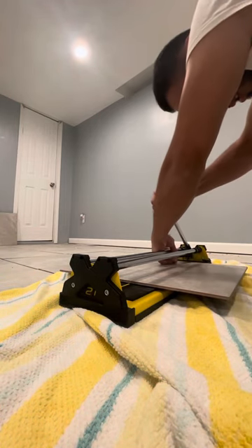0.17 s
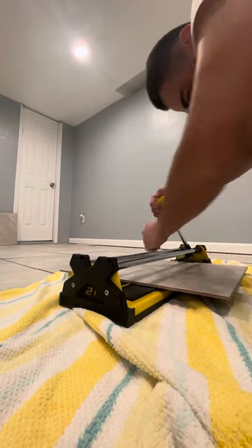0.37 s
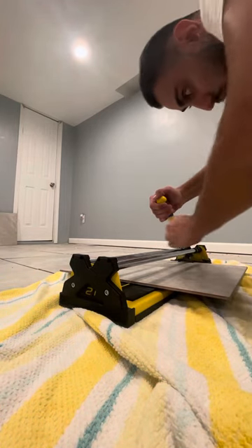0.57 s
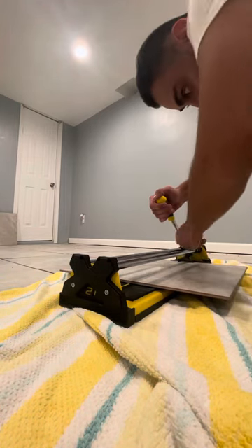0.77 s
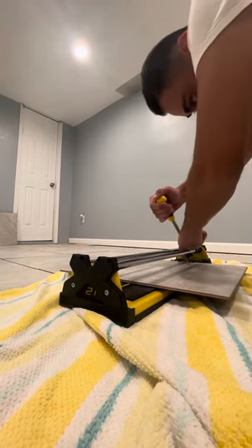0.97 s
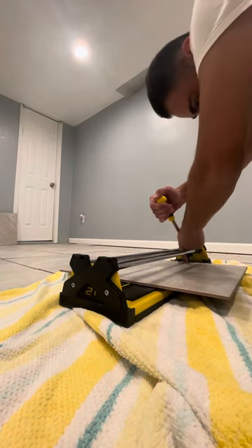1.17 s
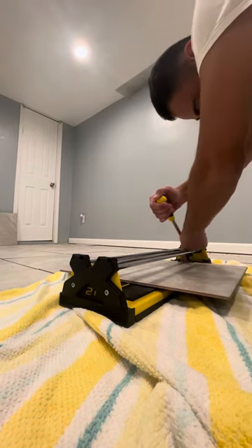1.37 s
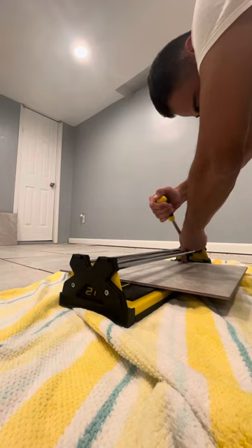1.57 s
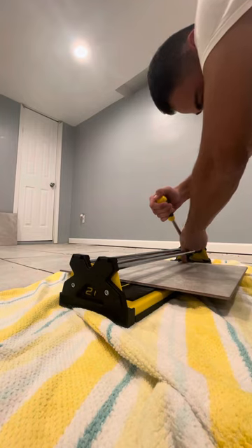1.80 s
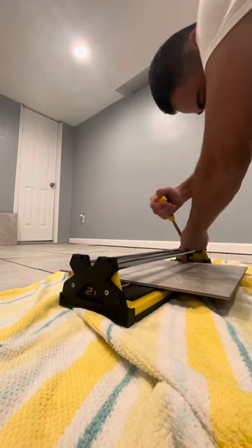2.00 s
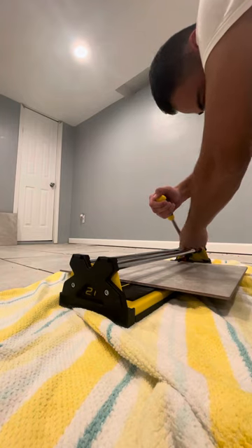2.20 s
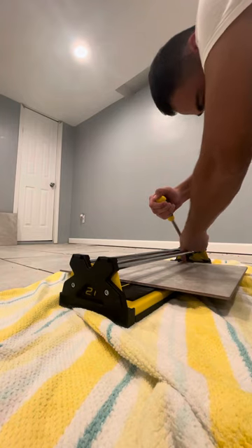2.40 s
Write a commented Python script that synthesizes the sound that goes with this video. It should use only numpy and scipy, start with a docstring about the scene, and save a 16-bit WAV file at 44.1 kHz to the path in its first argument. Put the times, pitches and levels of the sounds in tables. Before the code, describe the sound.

A manual tile cutter works close to the microphone in a bare, echoing room with a faint hum. At about 0.2 seconds a tile lands on the steel bed with a ringing clank. From 0.4 to 1.6 the carriage rolls quietly, with dull knocks, a click and faint scrapes. At 2 seconds the tile snaps loudly with a shrill ping, and the halves clatter down until about 2.4.

```python
"""A faint hum in a bare tiled room, then a clank close to a phone on the floor: a tile is set down
on the steel bed of a manual cutter, and the frame rings. The carriage slides and knocks along its rails,
then the breaker snaps the tile: cracks, and a shrill ping that rings on in the phone's microphone ports.
The halves clatter down while the phone's limiter recovers."""
import sys
import numpy as np
from scipy import signal
from scipy.fft import rfft, irfft
from scipy.io import wavfile
from scipy.ndimage import uniform_filter1d, minimum_filter1d

SR = 44100
rng = np.random.default_rng(int(sys.argv[2]) if len(sys.argv) > 2 else 0)


def generate_wav(signal):
    """Clip the signal to [-1, 1] and save it as 16-bit WAV at the path in sys.argv[1]."""
    frames = np.transpose(np.atleast_2d(signal))
    scaled = np.clip(frames, -1, 1) * 32767
    pcm = np.round(scaled).astype(np.int16)
    wavfile.write(sys.argv[1], SR, pcm)


N = 108045
T = np.arange(N) / SR
BIN_HZ = np.arange(N // 2 + 1) * SR / N


def undb(db):
    """Decibels to gain."""
    return 10 ** (np.asarray(db) / 20)


def unit(x):
    """Scale to rms 1."""
    return x / np.sqrt(np.mean(x ** 2))


def blow(x):
    """Scale to the energy of 10 ms at rms 1."""
    return x * np.sqrt(SR / 100 / np.mean(np.sum(x ** 2, axis=-1)))


def at(points, hz):
    """Read (Hz, value) points on a log-frequency axis."""
    p = np.array(points)
    return np.interp(np.log(hz + 1), np.log(p[:, 0]), p[:, 1])


def colour(x, points, tilt=0):
    """Causal filter through (Hz, dB) points, tilted in dB per octave about 2 kHz."""
    hz = np.arange(1025) * SR / 2048
    gain = undb(at(points, hz) + tilt * np.log2(np.maximum(hz, 300) / 2000))
    cepstrum = irfft(np.log(gain))
    cepstrum[1:1024] *= 2  # fold to minimum phase
    cepstrum[1025:] = 0
    impulse = irfft(np.exp(rfft(cepstrum)))
    return signal.fftconvolve(x, impulse[None], axes=1)[:, :x.shape[1]]


def noise(width):
    """Noise at the phone's two microphones; width is (Hz, side minus mid dB) points."""
    mid, side = rfft(rng.standard_normal((2, N)))
    share = undb(at(width, BIN_HZ))
    return irfft(np.array([mid + share * side, mid - share * side]) / np.sqrt(1 + share ** 2), N)


def fade(t60, t=T):
    """Exponential decay by 60 dB in t60 seconds."""
    return np.exp(-np.log(1000) * t / max(t60, 1e-4))


def add(out, start, x):
    """Mix x in from start, in seconds."""
    i = int(start * SR)
    n = min(x.shape[1], N - i)
    out[:, i:i + n] += x[:, :n]


def narrow(hz, width_hz):
    """A wavering tone: noise in one narrow resonance."""
    resonance = 1 / (1 + (2 * (BIN_HZ - hz) / width_hz) ** 2)
    return unit(irfft(rfft(rng.standard_normal(N)) * resonance, N))


# Stereo width close to the phone. Each row: frequency in Hz, side minus mid in dB.
NEAR_WIDTH = [(60, -17), (110, -21.5), (200, -17), (370, -10.5), (690, -4), (1270, -9), (2340, -11.5),
              (4310, -2.5), (7930, 0.5), (14600, -1)]
def burst(points, t60, tilt=0):
    """A short, close crack of dense, quickly damped modes."""
    decaying = noise(NEAR_WIDTH) * fade(t60)
    return blow(colour(decaying[:, :SR // 4], points, tilt))


# The room's hum, heard from the floor. Each row: frequency in Hz, relative level in dB.
HUM_TONES = [(75.4, -65), (156.1, -66), (193.8, -58.5), (242.2, -65)]
# The air around the phone. Each row: frequency in Hz, relative density in dB.
AIR_SPECTRUM = [(20, -40), (35, -6), (70, -10), (110, -5), (190, -6), (280, -4.5), (400, -12.5), (570, -9),
                (750, -19), (1200, -23.5), (1800, -38), (3000, -39.5), (6500, -46.5), (8500, -53),
                (11000, -50.5), (13000, -68)]
# Its stereo width. Each row: frequency in Hz, side minus mid in dB.
AIR_WIDTH = [(60, -11), (110, -9.5), (200, -16), (370, -3), (690, 2.5), (1270, 4), (2340, -1), (4310, -1),
             (7930, 1), (14600, 3)]
def room_tone(waver=.36, hum_trim_db=-.5, air_db=-56.5):
    """A low, wavering hum over the air of the room."""
    hum = sum(undb(db) * (np.sqrt(2) * np.sin(2 * np.pi * hz * T) + waver * narrow(hz, width_hz=14))
              for hz, db in HUM_TONES)
    air = unit(colour(noise(AIR_WIDTH), AIR_SPECTRUM))
    return undb(hum_trim_db) * hum + undb(air_db) * air


# Slides on the cutter, close by. Each row: peak time in seconds, level in dB,
# rise and fall in seconds, treble tilt in dB per octave.
SLIDE_STROKES = [(.215, -59, 0.052, 0.06, 2), (1.256, -58.5, 0.012, .02, -9),
                 (1.446, -61, 0.034, 0.025, -5), (1.547, -58.5, 0.018, 0.025, -0.5)]
# Their scrape at the phone. Each row: frequency in Hz, gain in dB.
SLIDE_SPECTRUM = [(300, -7), (1000, 6.5), (2800, -1.5), (4000, -13.5), (6500, -6), (8500, -9.5),
                  (11000, -11.5), (13500, -31.5)]
def slides(grain=.4):
    """Tile and carriage slide with a gritty friction that swells and dies away."""
    out = np.zeros((2, N))
    for peak, db, rise, fall, tilt in SLIDE_STROKES:
        hiss = noise(NEAR_WIDTH)
        roughness = np.repeat(rng.standard_normal(N // 64 + 1), 64)[:N]
        grit = unit(colour(hiss * np.exp(grain * roughness), SLIDE_SPECTRUM, tilt))
        swell = np.exp(-np.maximum((peak - T) / rise, (T - peak) / fall))
        out += undb(db) * grit * swell
    return out


# Knocks on the base, near the phone. Each row: start in seconds, level in dB, t60 in seconds.
BASE_KNOCKS = [(.165, -55, 0.12), (.258, -36, 0.19), (0.8001, -36.5, 0.042), (.811, -40, 0.046),
               (.84, -69, 0.075), (0.889, -62, .08), (0.995, -43.5, 0.15), (2.045, -31, 0.11),
               (2.119, -32, 0.062), (2.25, -45.5, 0.21)]
# Their dull tone. Each row: frequency in Hz, gain in dB.
KNOCK_SPECTRUM = [(60, -31.5), (180, -6), (290, -1), (430, 3), (560, -14.5), (720, -8.5), (950, -24.5),
                  (1200, -32), (2000, -46), (8000, -66.5)]
def knocks():
    """Hand, carriage and tile thud on the padded base."""
    out = np.zeros((2, N))
    for start, db, t60 in BASE_KNOCKS:
        add(out, start, undb(db) * burst(KNOCK_SPECTRUM, t60))
    return out


def judder(hz=850, db=-39, centre_s=.228, half_length_s=.016):
    """The tile's edge judders just before it drops."""
    return undb(db) * narrow(hz, width_hz=160) * np.exp(-((T - centre_s) / half_length_s) ** 4)


# The tile lands beside the phone, and later its halves. Each row: start in seconds, level in dB,
# treble tilt in dB per octave, chatter in seconds, lasting ring and dry clack in relative dB.
FRAME_BLOWS = [(.2132, -52.5, -3, .002, -26.5, 1), (0.224, -51, -2, .002, -31.5, -11.5),
               (0.245, -22, -1, 0.0031, -29, -5), (0.2487, -20, 1.5, 0.00072, -24.5, -9),
               (0.2532, -15.5, 0, 0.0029, -23.5, -10), (0.271, -26, 5, 0.011, -15, -5.5),
               (2.036, -27, -0.5, .003, -37, -6), (2.103, -28, 0, 0.0028, -43, -7),
               (2.1151, -16, 2.2, 0.00076, -32, -11), (2.123, -23.5, 1, 0.0022, -13.5, -9.5),
               (2.141, -33, 5.5, 0.0048, -25, -1), (2.243, -38.5, 1, 0.0091, -25, -5),
               (2.266, -39.5, 2, 0.015, -13, 1.5), (2.341, -44, -4, 0.003, -26, 10)]
# The steel frame with the tile on it. Each row: frequency in Hz, relative level in dB, t60 in seconds.
FRAME_MODES = [(441, -8, 0.5), (554, -5, 0.35), (783, -1, 0.48), (875, -9, .3), (953, -5, 0.42),
               (1028, -12, 0.45), (1143, 0, 0.32), (1500, 1, 0.25), (1539, -3, 0.41), (1578, -7, 0.4),
               (1746, -3, 0.31), (2126, 1, 0.3), (2187, -6, 0.36), (2334, -11, 0.37), (2491, -8, 0.4),
               (2657, -4, 0.41), (2939, -12, 0.49), (3035, -7, 0.5), (3275, -5, 0.43), (3365, -13, 0.6),
               (3948, -6, 0.38), (4016, -4, 0.48), (4224, -9, 0.56), (4611, -17, 0.5), (4805, -14, 0.5),
               (5095, -9, 0.4), (5737, -16, 0.57), (6205, -11, 0.31), (6325, -7, 0.29), (6514, -9, 0.36),
               (6553, -11, 0.53), (6891, -18, 0.5), (7419, -14, 0.26), (8230, -26, 0.3), (8754, -17, 0.38),
               (9300, -25, 0.3), (9850, -17, 0.25), (10100, -20, 0.2), (10450, -21, 0.2)]
# The dry clack of contact. Each row: frequency in Hz, gain in dB.
CLACK_SPECTRUM = [(60, -17.5), (200, -10.5), (500, -9.5), (1500, -3), (2600, -0.5), (3600, -12.5),
                  (6400, -12), (8000, -23), (10300, -15), (12000, -51.5)]
# The whole clank as heard from the floor. Each row: frequency in Hz, gain in dB.
CLANK_SPECTRUM = [(200, 0), (450, -0.5), (800, -0.5), (1300, 0), (2100, 3), (3100, 0.5), (4100, -5),
                  (5300, 2), (6500, 4), (9000, 0.5), (11000, 2.5), (12500, -21)]
def clanks(detune=.002, quick_t60=.061, clack_t60=.02):
    """Each blow chatters on the frame, whose modes lose most energy at once and then ring on."""
    out, t = np.zeros((2, N)), T[:SR * 3 // 4]
    for start, db, tilt, chatter, ring_db, clack_db in FRAME_BLOWS:
        ring = 0
        for hz, mode_db, t60 in FRAME_MODES:
            turns, side, drift = rng.standard_normal(3)
            spread = np.sign(side) * np.arctan(undb(at(NEAR_WIDTH, hz)))
            phase = 2 * np.pi * turns + np.array([[spread], [-spread]])  # one per microphone
            decay = fade(quick_t60, t) + undb(ring_db) * fade(t60, t)
            ring += undb(mode_db) * decay * np.sin(2 * np.pi * hz * (1 + detune * drift) * t + phase)
        clank = blow(ring * (1 - np.exp(-2 * t / chatter)))
        clack = burst(CLACK_SPECTRUM, clack_t60 + 2 * chatter)
        clank[:, :clack.shape[1]] += undb(clack_db) * clack
        add(out, start, undb(db) * blow(colour(clank, CLANK_SPECTRUM, tilt)))
    return out


# The rolling drone, alike at both microphones. Each row: time in seconds, relative level in dB.
ROLL_LEVELS = [(0.4, -70), (0.45, -51), (0.566, -48), (0.782, -51.5), (0.806, -45), (0.946, -61),
               (1.38, -62), (1.5, -76.5)]
# A close click on the rails. Each row: start in seconds, level in dB, t60 in seconds.
RAIL_CLICKS = [(0.987, -47.5, 0.08)]
# Its tone at the phone. Each row: frequency in Hz, gain in dB.
CLICK_SPECTRUM = [(100, -15), (450, 4), (850, 8), (1200, -2), (1650, 0), (2200, -5.5), (2900, -11.5),
                  (3600, -27), (6500, -19), (10500, -40), (12500, -48)]
# The carriage's ring. Each row: frequency in Hz, level against the click in dB, t60 in seconds.
CARRIAGE_MODES = [(467, -3, 0.68), (844, -20.5, .2), (1551, -9, 0.2), (1755, -5.5, 0.053),
                  (2990, -16.5, 0.154), (5650, -27, .2), (6800, -22, 0.22), (9340, -27, 0.26),
                  (10600, -30, 0.22)]
def carriage(drone_hz=282, drone_trim_db=-5, rattle_width_hz=45):
    """The carriage rolls with a low drone and clicks on the rails; its loose parts blur the ring."""
    times, levels = np.array(ROLL_LEVELS).T
    roll_db = np.interp(T, times, levels, left=-120, right=-120) + drone_trim_db
    drone = narrow(drone_hz, width_hz=42) * undb(roll_db)
    out = np.array([drone, drone])
    for start, db, t60 in RAIL_CLICKS:
        add(out, start, undb(db) * burst(CLICK_SPECTRUM, t60))
        for hz, mode_db, ring_t60 in CARRIAGE_MODES:
            ring = np.array([narrow(hz, rattle_width_hz) for _ in range(2)]) / np.sqrt(2)
            add(out, start, undb(db + mode_db) * fade(ring_t60) * ring)
    return out


# The tile gives way, close up. Each row: start in seconds, level in dB,
# treble tilt in dB per octave, t60 in seconds.
TILE_CRACKS = [(2.0127, -33, -5, 0.18), (2.025, -31, -3, 0.035), (2.031, -27.5, -6.5, 0.054),
               (2.0364, -12, 3, 0.025), (2.0393, -16, -1.5, 0.075)]
# One crack at the phone. Each row: frequency in Hz, gain in dB.
CRACK_SPECTRUM = [(30, -21), (60, -23), (300, -2.5), (650, 2), (1400, -3.5), (2100, -2), (3800, -18.5),
                  (6000, -2), (8000, -11.5), (11000, 1), (13500, -34)]
def cracks():
    """Cracks run through the tile under the breaker and lead to the break."""
    out = np.zeros((2, N))
    for start, db, tilt, t60 in TILE_CRACKS:
        add(out, start, undb(db) * burst(CRACK_SPECTRUM, t60, tilt))
    return out


# The break, right by the phone. Each row: start in seconds, level before the limiter in dB.
BREAK_PINGS = [(2.0365, -6), (2.03851, -7)]
# The tile's shrill modes. Each row: frequency in Hz, relative level in dB, t60 in seconds.
TILE_MODES = [(7580, -19, 0.045), (9500, 4, 0.0058), (9900, 9, 0.009), (10500, 0, 0.006),
              (11100, -6, 0.003)]
def ping(rise_s=.00057, mic_lag_s=.000045):
    """The break sets the tile ringing; the sound reaches one microphone just after the other."""
    out = np.zeros((2, N))
    t = np.maximum(T[:SR // 2] - np.array([[0], [mic_lag_s]]), 0)
    ring = sum(undb(db) * fade(t60, t) * np.sin(2 * np.pi * hz * t) for hz, db, t60 in TILE_MODES)
    ring = blow(ring * (1 - np.exp(-(t / rise_s) ** 2)))
    for start, db in BREAK_PINGS:
        add(out, start, undb(db) * ring)
    return out


# The bare tiled room around the cutter. Each row: frequency in Hz, t60 in seconds.
ROOM_DECAY = [(100, .6), (400, 0.77), (1000, .7), (3000, 0.58), (6500, 0.49), (10000, 0.21)]
# Its tail, heard from the floor. Each row: frequency in Hz, gain in dB.
TAIL_SPECTRUM = [(60, -10), (300, 0), (700, 0), (2000, -7), (4000, 6.5), (6500, -1.5), (8500, -2.5),
                 (10000, -11.5), (11200, -10.5), (12500, -31.5)]
# The tail's stereo width. Each row: frequency in Hz, side minus mid in dB.
TAIL_WIDTH = [(60, -9.5), (110, -11.5), (200, -18), (370, -7), (690, 2.5), (1270, 1.5), (2340, -6.5),
              (4310, -3.5), (7930, 1), (14600, -4.5)]
def reverberation(x, gain_db=-4.5, onset_s=.0089):
    """Hard walls and floor return a dense tail, each band with its own decay."""
    spectrum = rfft(noise(TAIL_WIDTH))
    centres_hz = [100, 200, 400, 800, 1600, 3200, 6400, 10000]
    octave = np.log2(np.clip(BIN_HZ, centres_hz[0], centres_hz[-1]))
    tail = np.zeros((2, N))
    for hz in centres_hz:
        band = np.maximum(1 - abs(octave - np.log2(hz)), 0)
        tail += irfft(spectrum * band, N) * fade(at(ROOM_DECAY, hz))
    tail *= 1 - np.exp(-(T / onset_s) ** 2)
    tail = colour(unit(tail) / np.sqrt(N), TAIL_SPECTRUM)
    return undb(gain_db) * signal.fftconvolve(x, tail, axes=1)[:, :N]


# Resonances of the phone's microphone ports. Each entry: frequency in Hz.
PORT_CENTRES = [8750, 9550, 9835]
# Their shapes, in the same order. Each row: width in Hz, gain in dB.
PORT_PEAKS = [(130, 7), (300, 6), (110, 16.5)]
def port_ring(x):
    """Excited by the reverberation, the two microphone ports ring shrilly in opposite phase."""
    lift = sum(undb(db) / (1 + 2j * (BIN_HZ - hz) / width)
               for hz, (width, db) in zip(PORT_CENTRES, PORT_PEAKS))
    side = irfft(rfft(x[0] - x[1]) / 2 * lift, N)
    return x + np.array([side, -side])


def scene():
    """The cutter stands close to the phone, a little to the right, and the room answers."""
    pan = undb([[-.7], [.7]])
    cutter = clanks() + cracks() + ping() + knocks() + slides() + judder() + carriage()
    return pan * (cutter + room_tone()) + port_ring(pan * reverberation(cutter))


def record(dry, limit=.8, hold_s=.087, recover_db_per_s=57, top_hz=14500):
    """The phone's limiter ducks at the loudest peak, holds and slowly recovers; the top is cut."""
    over_db = 20 * np.log10(np.maximum(abs(dry).max(axis=0) / limit, 1))
    hold = 2 * int(hold_s * SR / 2) + 1
    held_db = -minimum_filter1d(-over_db, hold, origin=hold // 2)
    recovery_db = recover_db_per_s * T
    duck_db = np.maximum.accumulate(held_db + recovery_db) - recovery_db
    ahead_db = -minimum_filter1d(-duck_db, size=25)  # ducks just before the peak
    limited = dry * undb(-uniform_filter1d(ahead_db, size=25))
    return signal.sosfilt(signal.ellip(8, .2, 70, top_hz, fs=SR, output="sos"), limited)


dry = scene()
out = record(dry)
generate_wav(out)
```